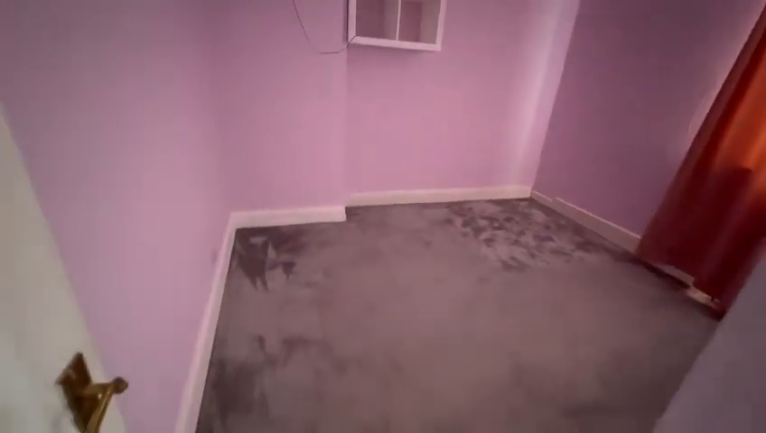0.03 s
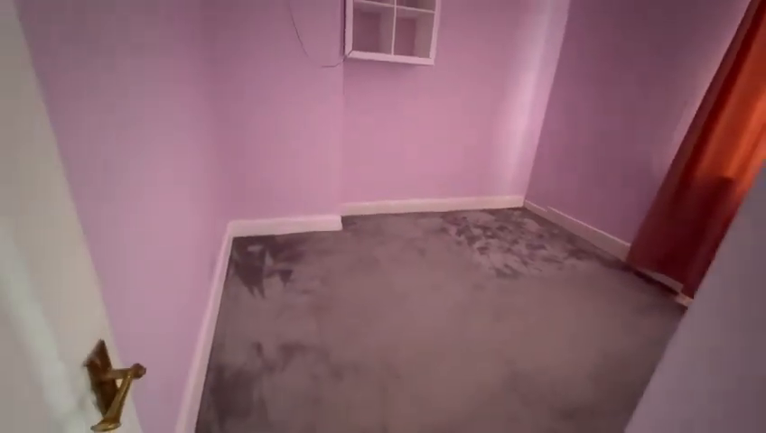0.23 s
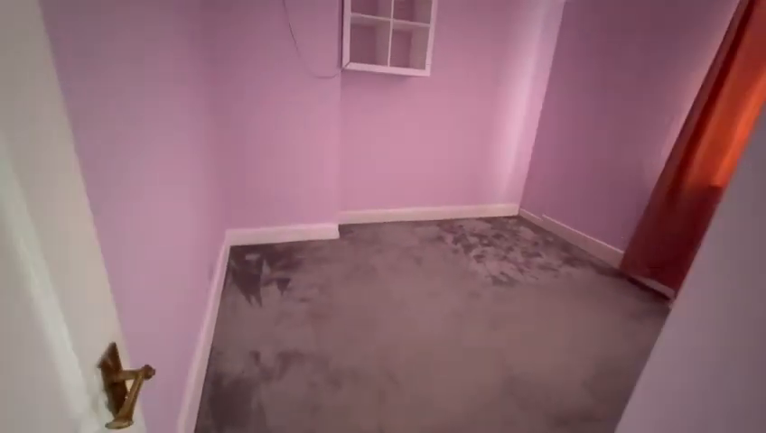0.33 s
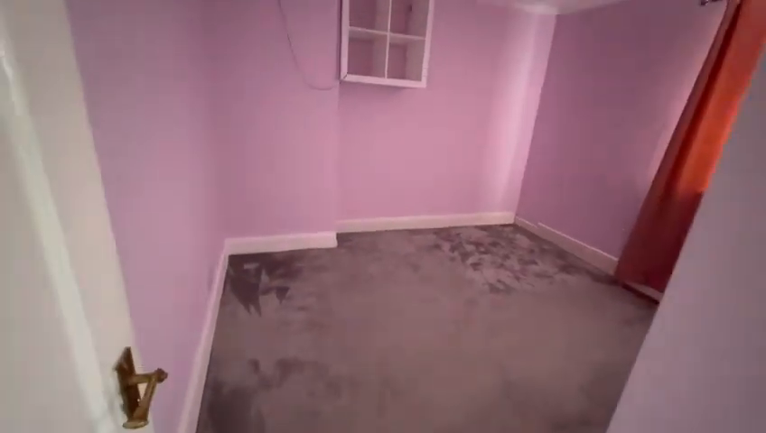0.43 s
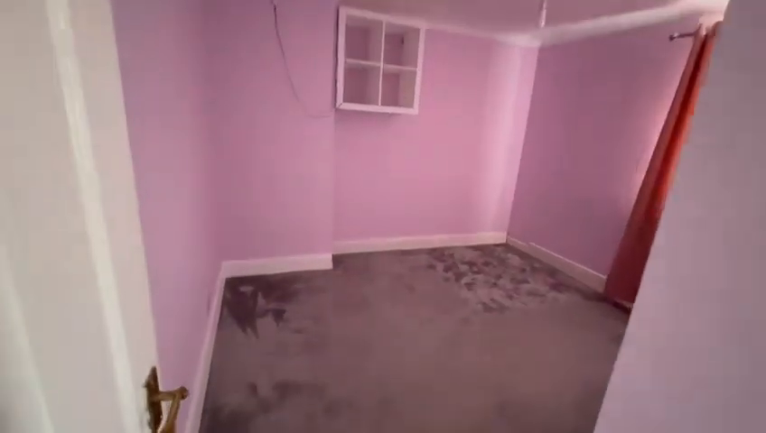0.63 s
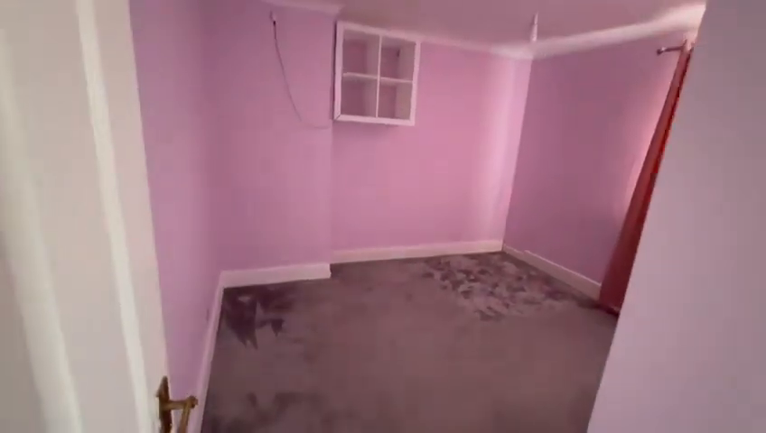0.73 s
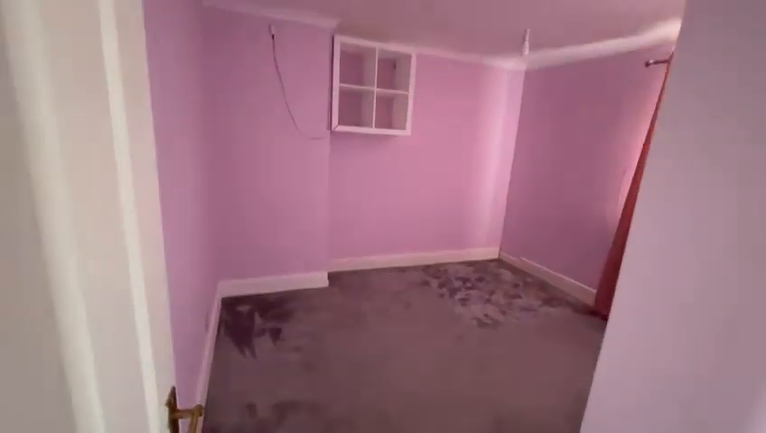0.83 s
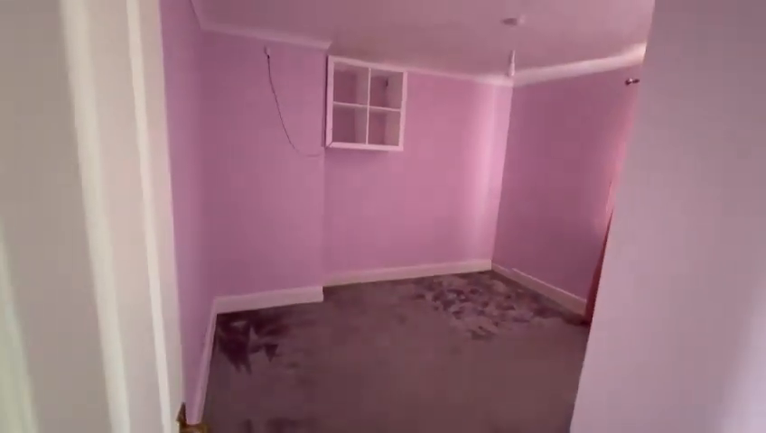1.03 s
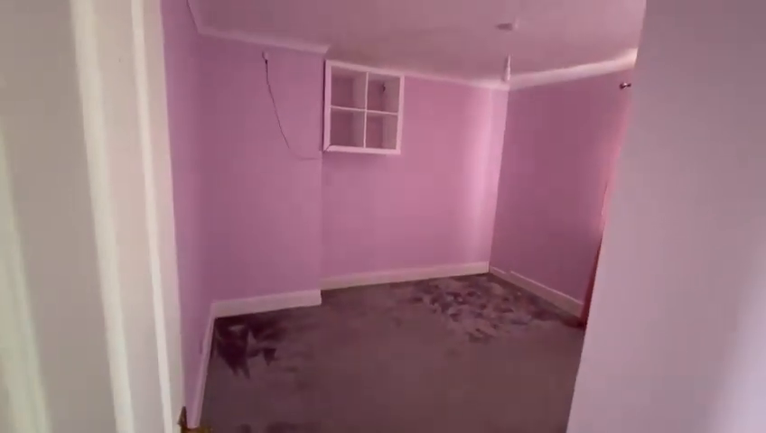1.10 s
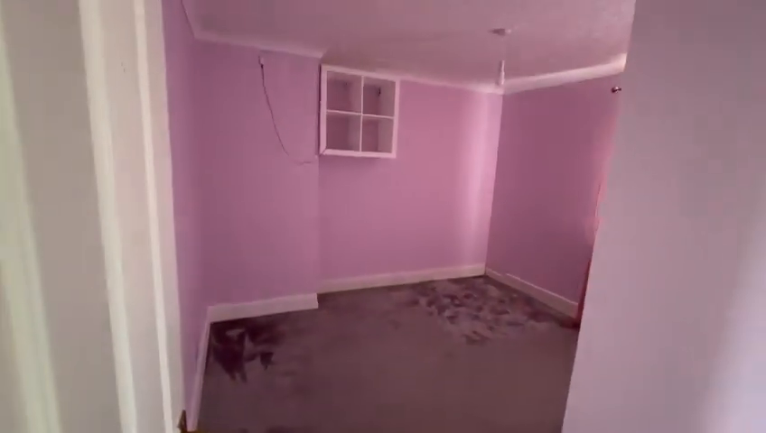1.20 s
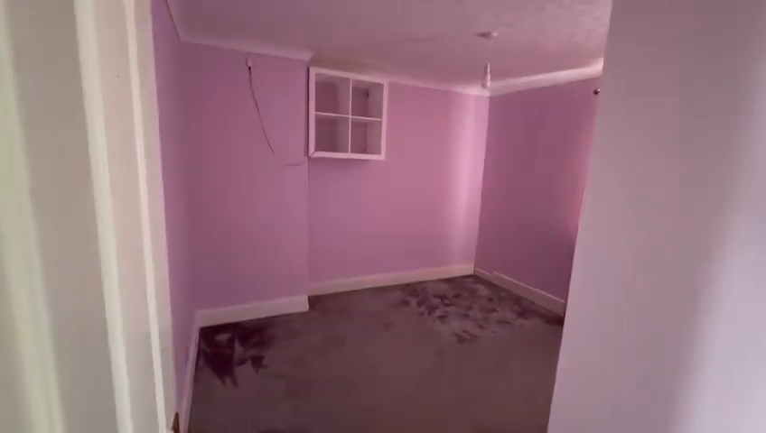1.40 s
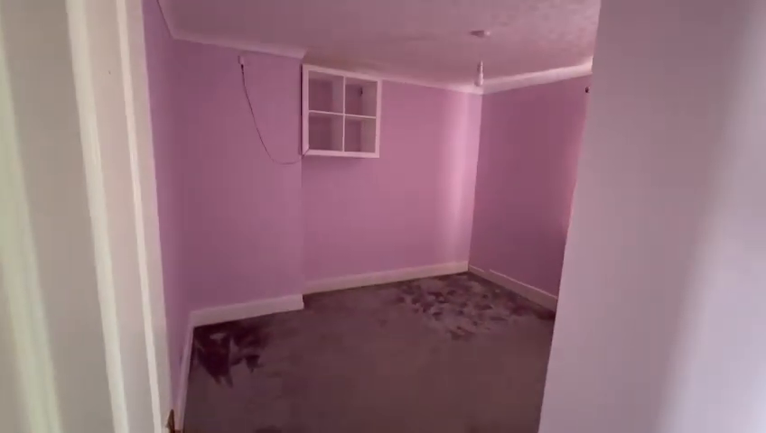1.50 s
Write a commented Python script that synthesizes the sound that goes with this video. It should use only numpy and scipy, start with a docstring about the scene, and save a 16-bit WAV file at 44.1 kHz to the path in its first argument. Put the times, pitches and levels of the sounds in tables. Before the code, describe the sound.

Footsteps thump on a carpeted wooden floor in an empty room. Boards creak faintly and clothes rustle, then a heavy step lands, followed by lighter ones, a brief scuff and a second heavy step, all close by.

```python
"""Clothes rustle and a board creaks in slow slips as someone steps through a doorway into an empty room.
Each slip is a falling woody chirp with a splintery crackle. Two heavy steps and a few light ones land
on the carpeted wooden floor: heels click and knock, soles thump, the boards ring and the joists boom.
A sole scuffs the carpet in between, and the bare room rings on over the faint rumble of the house."""
import sys
import numpy as np
from scipy import signal
from scipy.io import wavfile
from scipy.ndimage import uniform_filter1d

SR = 44100
rng = np.random.default_rng(int(sys.argv[2]) if len(sys.argv) > 2 else 0)


def output_pcm(signal):
    """Save a mono or channel-first signal as 16-bit PCM at the path in sys.argv[1].

    Samples are clipped to [-1, 1] before scaling.
    """
    pcm = np.clip(np.atleast_2d(signal).T, -1, 1) * 32767
    wavfile.write(sys.argv[1], SR, np.round(pcm).astype(np.int16))


N = 68355
T = np.arange(N) / SR
EDGES_HZ = 28 * 2 ** (np.arange(23) / 2.5)
CENTRES_HZ = np.sqrt(EDGES_HZ[1:] * EDGES_HZ[:-1])

# How alike the noise is in both ears: band_hz, correlation
STEREO_LIKENESS = [(50, -0.14), (130, 1), (260, 0.68), (500, 0.3), (1000, 0.18), (4000, 0.28),
                   (9000, -0.28)]
# Level ride of the moving clothes: time_s, level_db
RUSTLE_RIDE = [(0, -59), (0.13, -56.5), (0.2, -60.5), (0.42, -62.5), (0.47, -65), (0.62, -61), (0.76, -67),
               (0.87, -60), (1.0, -73.5), (1.18, -68.5), (1.26, -80.5), (1.4, -82.5), (1.53, -72)]
# Tone of the cloth: band_hz, relative_db
RUSTLE_TONE = [(30, -71), (80, -29), (250, 14), (450, 2.5), (800, 7), (1400, 4), (2500, 3.5), (3800, 0),
               (5500, -1), (8300, 3), (11000, -1.5)]
# Sole scuffs and cloth swishes: peak_s, level_db, rise_s, decay_s
SCUFFS = [(0.7925, -50, 0.0017, 0.0066), (0.816, -54, 0.018, 0.027), (1.1, -53, 0.041, 0.041)]
# Bright tone of a scuff: band_hz, relative_db
SCUFF_TONE = [(150, -13), (800, -5), (2800, -11), (4200, -7.5), (5600, -2), (8200, -0.5), (11000, -21)]
# Reflections off the door and its frame: left_delay_s, right_delay_s, gain_db
DOORWAY_ECHOES = [(.0029, 0.0019, -7), (.0052, 0.007, -3), (0.0104, 0.01, -5.5)]
# Resonances mixed into the rustle: centre_hz, width_hz, gain_db
RUSTLE_PEAKS = [(3720, 580, -2), (8050, 370, -1.5)]
# Background rumble of the house: band_hz, level_db
HOUSE_RUMBLE = [(30, -81.5), (50, -72), (100, -73), (160, -91), (290, -86.5), (450, -89), (8000, -91.5),
                (11000, -106)]
# Slips of the creaking boards, and last a higher squeak as the second step scuffs: start_s, level_db,
# first_pitch_hz, swell_s
SLIPS = [(0.0262, -50, 925, 0.0041), (0.0625, -49, 940, 0.0056), (0.0925, -51, 926, 0.0049),
         (0.1235, -46, 927, 0.0027), (0.153, -53, 920, .004), (0.178, -53.5, 915, .005),
         (0.599, -45.5, 916, 0.0035), (1.087, -59, 1737, 0.0067)]
# Tone of a slip's crack and reverb: band_hz, relative_db
SLIP_TONE = [(80, -23.5), (850, 1), (1400, -7), (3000, -28), (8000, -7), (11000, -48)]
# Decay of the bare room: band_hz, t60_s
ROOM_DECAY = [(60, 0.74), (200, 0.53), (400, 0.36), (800, 0.31), (2000, 0.42), (9000, 0.15)]
# Tone of the steps' reverb: band_hz, relative_db
REVERB_TONE = [(40, -14), (110, -18.5), (210, 0), (300, -4), (430, -11.5), (680, 2.5), (1050, -2),
               (1500, -3), (2500, -1), (5000, -38), (11000, -2.5)]
# Crisp little snaps: start_s, level_db, pitch_hz
SNAPS = [(0.0654, -61, 4960), (0.1242, -55.5, 4960), (0.135, -56, 6500), (0.1545, -58, 7800),
         (0.8025, -43, 7720)]
# Heels on the boards: start_s, knock_db, first_pitch_hz, last_pitch_hz, glide_s, decay_s, pan_db,
# click_db, board_ring_db, room_ring_db, reverb_bass_db, reverb_middle_db, reverb_treble_db
FOOTFALLS = [(0.2093, -32, 860, 294, 0.00328, 0.015, 4.5, -56, -50.5, -43.5, -34, -43, -77),
             (0.5040, -49.5, 805, 464, 0.0058, 0.0086, -0.5, -68, -61, -76, -51.5, -60.5, -66.5),
             (0.7520, -61, 450.3, 257, 0.0069, 0.012, 7, -66, -66.5, -56, -56.5, -66, -84),
             (1.023, -31, 917, 413, 0.0034, 0.0028, 4.5, -45.5, -50, -50.5, -48, -53, -65)]
# Tone of a heel click: band_hz, relative_db
CLICK_TONE = [(120, -62), (1000, 6), (2300, -7), (4000, -39), (11000, -5.5)]
# Woody ring of the boards: pitch_hz, relative_db, t60_s
BOARD_MODES = [(632, -13, 0.57), (697.6, -4, 0.48), (760, -1, 0.27), (832, -1, 0.33), (882, 0.5, 0.29),
               (1143, -6, 0.31)]
# Standing waves of room and floor: pitch_hz, left_gain_db, right_gain_db, t60_s
ROOM_MODES = [(107.5, -6, -12, 0.88), (162.6, -10.5, -2.5, 0.84), (226.2, 2, 3, 0.57), (263, -2, -7, 0.69),
              (295.3, -0.5, -6.5, 0.61), (346, -9, -18, 0.15), (447, -15, -27, 0.8), (485, -4.5, -11, 0.47)]
# The ball of the foot landing: start_s, level_db, pitch_hz, swell_s, room_ring_db, reverb_db
THUMPS = [(0.2154, -29.5, 157.4, 0.0042, -62, -56), (0.5126, -41, 246, 0.0037, -54, -74),
          (1.2116, -40, 195, 0.0021, -63.5, -53)]
# Joists giving under the weight: start_s, level_db, swell_s, pitch_hz, other_modes_db
BOOMS = [(0.222, -43, 0.044, 75.5, -60), (0.497, -57.5, 0.051, 57, -77), (0.856, -55, 0.054, 84, -65),
         (1.027, -34.5, 0.055, 81.1, -40)]
# The joists' other modes: pitch_hz, relative_db, t60_s
JOIST_MODES = [(41, -6, 0.8), (104.4, 0.5, 0.63), (121.8, -3.5, 0.56)]

ROOM_PAN_DB = 1.1
BASS_HZ, MIDDLE_HZ, TREBLE_HZ = 176, 636, 2400   # where the three reverb levels sit


def from_db(db):
    """Decibels to gain."""
    return 10 ** (np.asarray(db) / 20)


def per_band(points):
    """A curve over frequency, read at the band centres."""
    hz, value = np.transpose(points)
    return np.interp(np.log(CENTRES_HZ), np.log(hz), value)


def panned(pan_db):
    """Left and right gains; positive leans left."""
    return from_db([[pan_db], [-pan_db]])


def since(start_s):
    """Time since the start, zero before it."""
    return np.maximum(T - start_s, 0)


def dying(t, t60):
    """Falls by 60 dB in t60."""
    return np.exp(-np.log(1000) * t / t60)


def swelling(t, swell_s):
    """Rises to 1 at the swell time, then dies."""
    return t / swell_s * np.exp(1 - t / swell_s)


def noise_bands():
    """Stereo noise in bands (band, channel, sample), each at a steady level of 1."""
    bands, run_in = [], SR // 4
    white = rng.standard_normal((2, 2, N + run_in))
    for k, alike in enumerate(np.clip(per_band(STEREO_LIKENESS), -.99, .99)):
        low_hz, high_hz = EDGES_HZ[k:k + 2]
        bandpass = signal.butter(2, [low_hz, high_hz], "band", fs=SR, output="sos")
        pair = signal.sosfilt(bandpass, white[k % 2])
        window = int(SR * max(2 / (high_hz - low_hz), .02))
        level = np.sqrt(uniform_filter1d(pair ** 2, window) + 1e-20)
        mid, side = (pair / level)[:, run_in:]
        bands.append(np.sqrt((1 + alike) / 2) * mid + np.sqrt((1 - alike) / 2) * side * [[1], [-1]])
    return np.array(bands)


def coloured(bands, tone):
    """The bands mixed to a tone curve, at level 1."""
    gains = from_db(per_band(tone))
    return np.tensordot(gains / np.linalg.norm(gains), bands, 1)


def rustle_and_scuffs(bands, grain_db=2.5, grains_per_s=500, doorway_share=0.72):
    """Clothes rustle and brighter scuffs swell and die, grainy as fibres catch and let go."""
    rustle = from_db(np.interp(T, *np.transpose(RUSTLE_RIDE))) * coloured(bands, RUSTLE_TONE)
    power = np.zeros(N)
    for peak, db, rise, decay in SCUFFS:
        envelope = np.exp(-.5 * (np.minimum(T - peak, 0) / rise) ** 2 - since(peak) / decay)
        power += (from_db(db) * envelope) ** 2
    scuffs = np.sqrt(power) * coloured(bands[:, :, ::-1], SCUFF_TONE)   # reversed: unlike the rustle
    grain = from_db(grain_db * np.interp(T * grains_per_s, np.arange(N), rng.standard_normal(N)))
    return doorway((rustle + doorway_share * scuffs) * grain) + (1 - doorway_share) * scuffs * grain


def doorway(sound):
    """Near reflections and two resonances colour the sound without changing its level."""
    out = sound.copy()
    for *delays, db in DOORWAY_ECHOES:
        echo = np.array([np.interp(T - delay, T, side) for delay, side in zip(delays, sound)])
        out += from_db(db) * echo
    for hz, width, db in RUSTLE_PEAKS:
        out += from_db(db) * signal.lfilter(*signal.iirpeak(hz, hz / width, fs=SR), out)
    return out * np.std(sound) / np.std(out)


def house(bands, hum_hz=305.5, hum_db=-74.5):
    """A bed of faint rumble and hum."""
    rumble = np.tensordot(from_db(per_band(HOUSE_RUMBLE)), bands, 1)
    return rumble + from_db(hum_db) * np.sin(2 * np.pi * hum_hz * T)


def creak(bands, fall_hz_per_s=15000, crack_db=-16, crackle_db=-22, crack_swell_s=0.006):
    """Each slip is a woody chirp that sinks as it slows, with a faint crack and splintery crackle."""
    out = np.zeros((2, N))
    crack = from_db(crack_db) * coloured(bands, SLIP_TONE) + from_db(crackle_db) * crackle()
    for start, db, hz, swell in SLIPS:
        t = since(start)
        chirp = np.sin(2 * np.pi * (hz * t - fall_hz_per_s * t ** 2 / 2))
        out += from_db(db) * (swelling(t, swell) ** 2 * chirp + crack * swelling(t, crack_swell_s))
    return out


def crackle(clicks_per_s=300, spread_db=4, low_hz=3500, high_hz=9000, pitches=8):
    """Tiny snaps of wood fibres, each ringing briefly at one of several pitches; level 1."""
    out = np.zeros((2, N))
    for hz in np.geomspace(low_hz, high_hz, pitches):
        clicks = rng.random((2, N)) < clicks_per_s / pitches / SR
        strength = from_db(spread_db * np.minimum(rng.exponential(1, (2, N)), 2))
        out += signal.lfilter(*signal.iirpeak(hz, Q=14, fs=SR), clicks * strength + 1e-18)
    return out / np.std(out)


def reverb(bands, build_s=0.0013, slip_send_db=-12, thump_tilt_db_per_oct=-8):
    """The bare room's diffuse tail after each slip, footfall and thump, dying band by band."""
    step_tone = per_band(REVERB_TONE)
    thump_tone = step_tone + thump_tilt_db_per_oct * np.maximum(np.log2(CENTRES_HZ / BASS_HZ), 0)
    hits = [(start, db + slip_send_db + per_band(SLIP_TONE)) for start, db, *_ in SLIPS]
    for start, *_, bass_db, middle_db, treble_db in FOOTFALLS:
        send_db = per_band([(BASS_HZ, bass_db), (MIDDLE_HZ, middle_db), (TREBLE_HZ, treble_db)])
        hits.append((start, send_db + step_tone))
    hits += [(start, db + thump_tone) for start, *_, db in THUMPS]
    out = np.zeros((2, N))
    for k, t60 in enumerate(per_band(ROOM_DECAY)):
        tail = (1 - np.exp(-T / build_s)) * dying(T, t60)
        power = np.zeros(N)
        for start, levels_db in hits:
            onset = int(start * SR)
            power[onset:] += (from_db(levels_db[k]) * tail[:N - onset]) ** 2
        out += np.sqrt(power) * bands[k]
    return out * panned(ROOM_PAN_DB)


def snaps(swell_s=0.0005):
    """Single bright snaps: a tiny burst of noise around one pitch."""
    out = np.zeros((2, N))
    for start, db, hz in SNAPS:
        burst = signal.lfilter(*signal.iirpeak(hz, Q=9, fs=SR), rng.standard_normal((2, N)))
        out += from_db(db) * swelling(since(start), swell_s) * burst / np.std(burst)
    return out


def heel_clicks(bands, decay_s=0.0031):
    """The first contact of the shoe is a short click."""
    envelope = np.zeros(N)
    for start, _, _, _, _, _, _, click_db, *_ in FOOTFALLS:
        envelope += from_db(click_db) * (T > start) * np.exp(-since(start) / decay_s)
    return envelope * coloured(bands, CLICK_TONE)


def knocks(attack_s=0.0004, left_lag_s=0.00018, carpet_hz=1550):
    """High bending waves in a board arrive first, so each knock drops in pitch; the carpet muffles it."""
    out = np.zeros((2, N))
    for start, db, first_hz, last_hz, glide, decay, pan_db, *_ in FOOTFALLS:
        t = np.array([since(start + left_lag_s), since(start)])
        cycles = last_hz * t + (first_hz - last_hz) * glide * (1 - np.exp(-t / glide))
        envelope = (1 - np.exp(-t / attack_s)) * np.exp(-t / decay)
        out -= from_db(db) * panned(pan_db) * envelope * np.sin(2 * np.pi * cycles)
    return signal.sosfilt(signal.butter(2, carpet_hz, fs=SR, output="sos"), out + 1e-18)


def ringing(build_s=0.016, ear_spread_rad=0.8):
    """Each footfall rings the boards and the low modes of the room; thumps ring only the room."""
    room, boards, out = np.zeros((3, 2, N))
    for hz, left_db, right_db, t60 in ROOM_MODES:
        room += from_db([[left_db], [right_db]]) * dying(T, t60) * np.sin(2 * np.pi * hz * T)
    for hz, db, t60 in BOARD_MODES:
        ear_phases = ear_spread_rad * rng.standard_normal((2, 1))
        boards += from_db(db) * dying(T, t60) * np.sin(2 * np.pi * hz * T + ear_phases)
    rings = [(start, from_db(board_db) * boards + from_db(room_db) * room)
             for start, *_, board_db, room_db, _, _, _ in FOOTFALLS]
    rings += [(start, from_db(room_db) * room) for start, *_, room_db, _ in THUMPS]
    build = 1 - np.exp(-T / build_s)
    for start, ring in rings:
        onset = int(start * SR)
        out[:, onset:] += (build * ring)[:, :N - onset]
    return out


def thumps():
    """The ball of the foot lands softly and pushes the boards through a few low cycles."""
    out = np.zeros(N)
    for start, db, hz, swell, *_ in THUMPS:
        t = since(start)
        out += from_db(db) * swelling(t, swell) * np.sin(2 * np.pi * hz * t)
    return out * panned(ROOM_PAN_DB)


def joists(tail_db=-2.5, tail_t60_s=0.43, build_s=0.0039):
    """The floor swells into a low boom as the weight comes on, then rings out."""
    out = np.zeros(N)
    for start, db, swell, hz, others_db in BOOMS:
        t = since(start)
        load = np.sin(np.pi / 2 * np.minimum(t / swell, 2)) ** 2
        tail = from_db(tail_db) * np.minimum(10 * t / swell, 1) * dying(since(start + swell), tail_t60_s)
        out += from_db(db) * np.hypot(load, tail) * np.sin(2 * np.pi * hz * t)
        build = 1 - np.exp(-t / build_s)
        for mode_hz, mode_db, t60 in JOIST_MODES:
            out += from_db(others_db + mode_db) * build * dying(t, t60) * np.sin(2 * np.pi * mode_hz * t)
    return out * panned(ROOM_PAN_DB)


def scene():
    """Rustle, creak and steps in the bare room."""
    diffuse, near, far = noise_bands(), noise_bands(), noise_bands()
    steps = heel_clicks(near) + knocks() + ringing() + thumps() + joists()
    return steps + reverb(diffuse) + creak(far) + snaps() + rustle_and_scuffs(near) + house(far)


def record(dry, top_roll_hz=10120, low_cut_hz=43.5, top_cut_hz=11400):
    """Master EQ: the top and the deepest bass roll off, then the top is cut steeply."""
    dull = signal.sosfilt(signal.butter(6, top_roll_hz, fs=SR, output="sos"), dry)
    thin = signal.sosfilt(signal.butter(2, low_cut_hz, "high", fs=SR, output="sos"), dull)
    return signal.sosfilt(signal.ellip(10, .2, 70, top_cut_hz, fs=SR, output="sos"), thin)


dry = scene()
out = record(dry)
output_pcm(out)
```